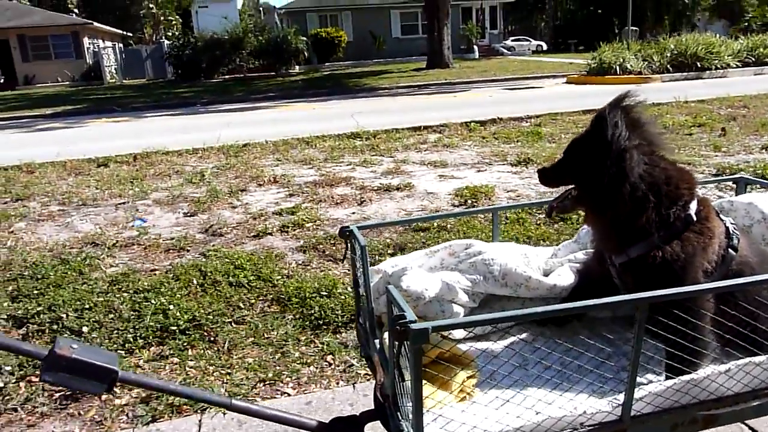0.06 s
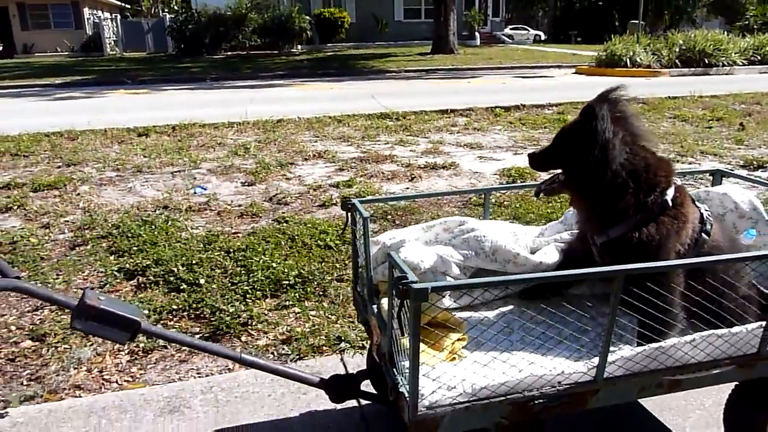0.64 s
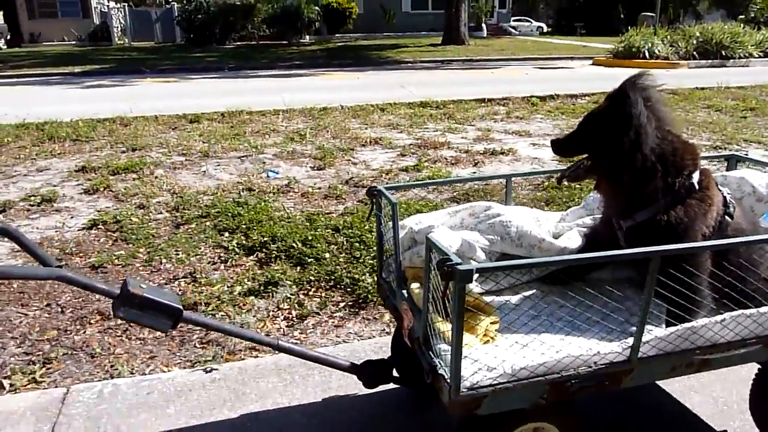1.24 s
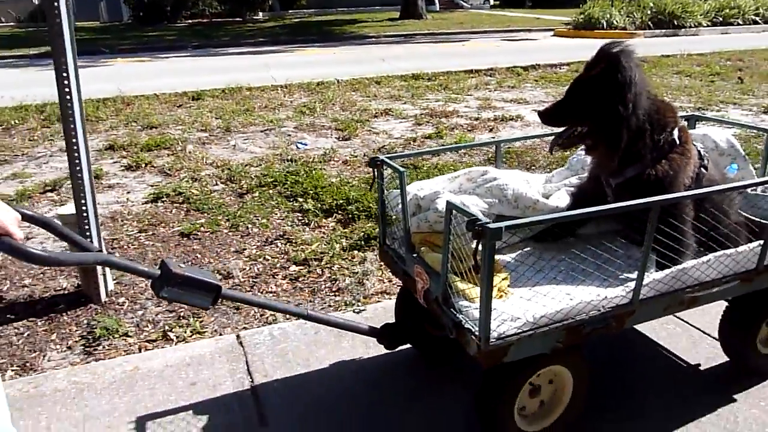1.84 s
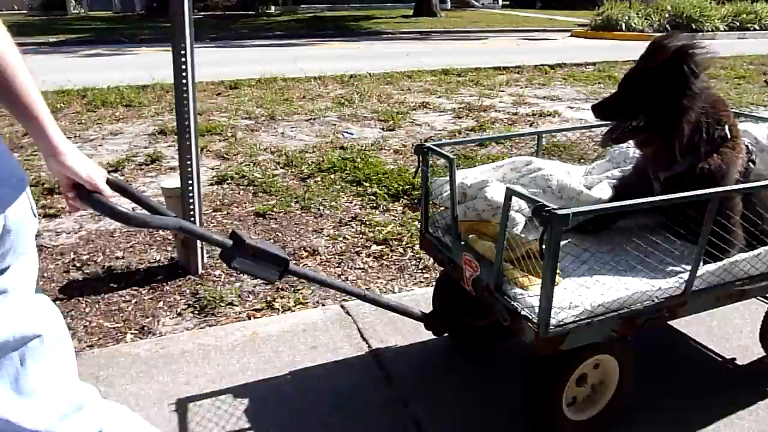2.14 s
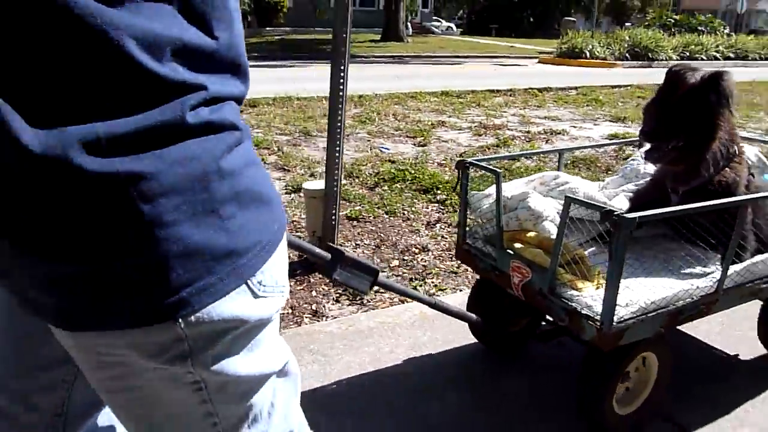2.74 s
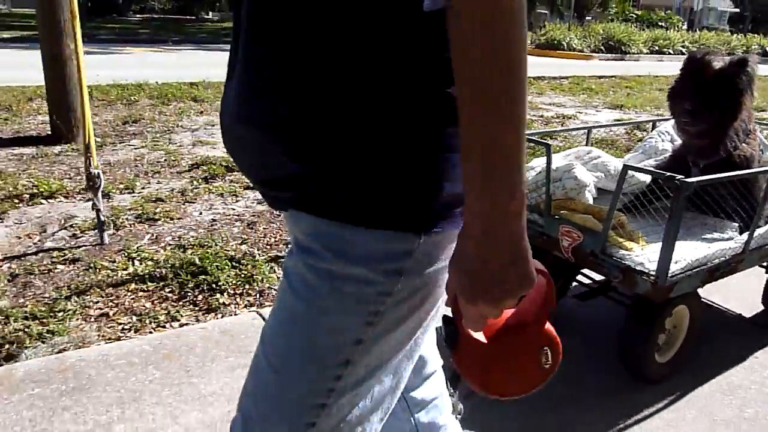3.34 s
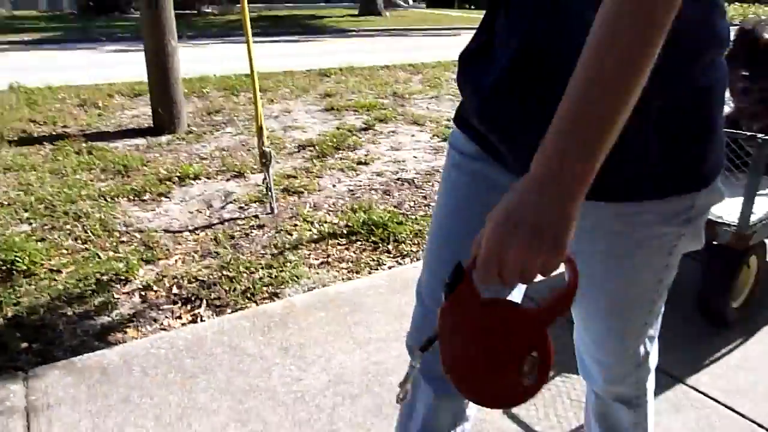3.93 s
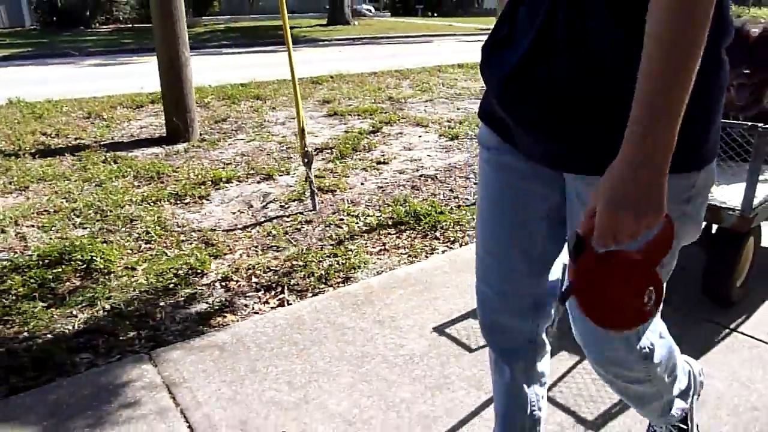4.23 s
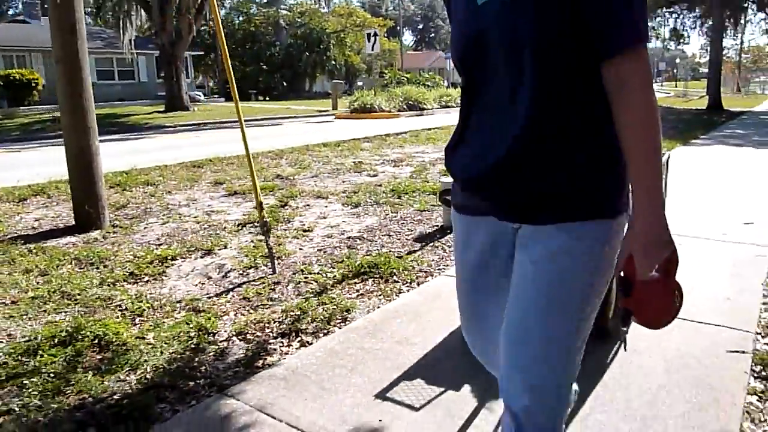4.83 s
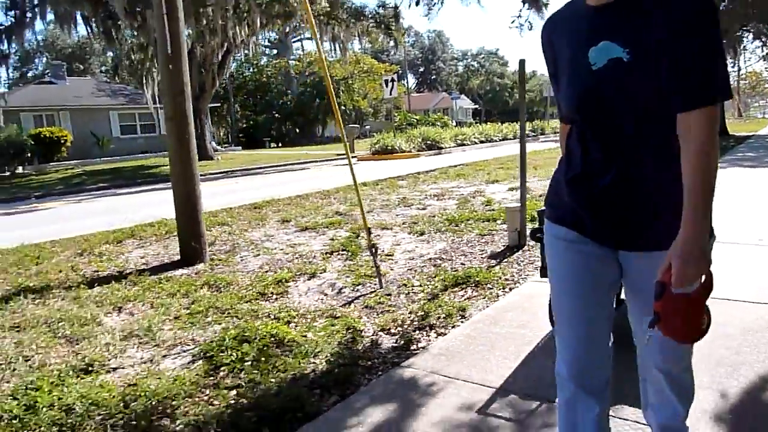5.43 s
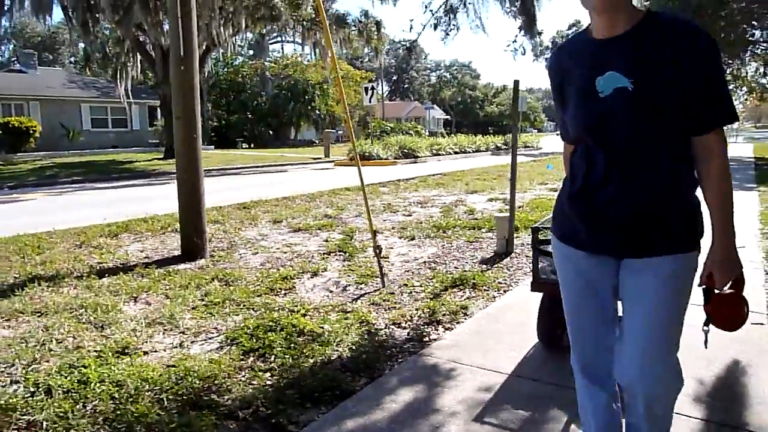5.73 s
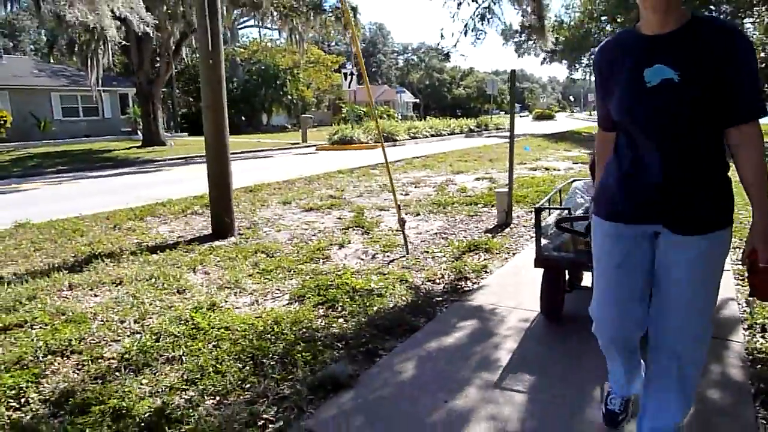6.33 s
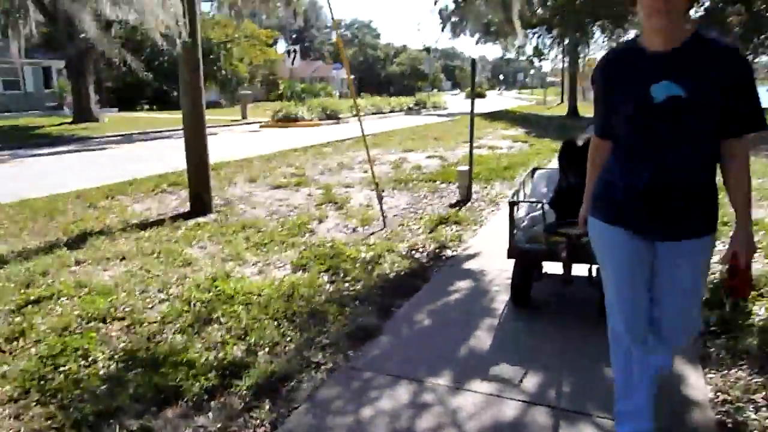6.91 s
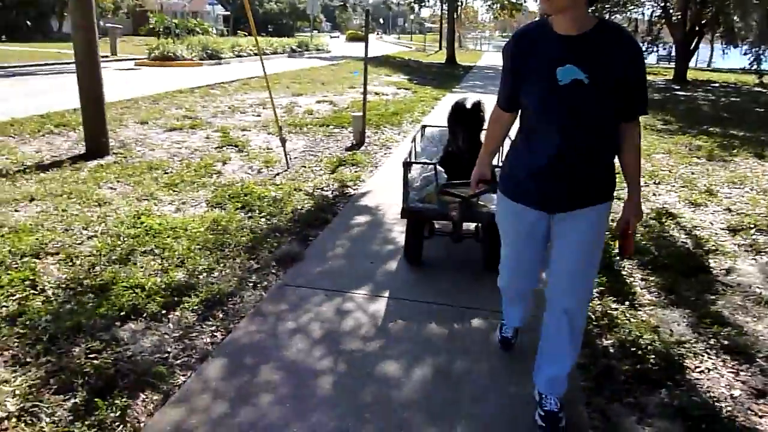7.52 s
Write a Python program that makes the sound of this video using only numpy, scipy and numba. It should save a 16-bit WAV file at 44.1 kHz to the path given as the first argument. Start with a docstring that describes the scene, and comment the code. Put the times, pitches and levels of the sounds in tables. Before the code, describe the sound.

Wind thumps and rasps on a hand-held microphone, loud for the first second, then dropping to scattered short puffs. Beneath it a steel mesh wagon rolls along a concrete sidewalk with a steady low tyre rumble, and loose metal gives small, bright ticks now and then. One dry wheel makes short, high squeaks from the start until nearly 4 seconds, clearest between 1 and 3 seconds. The walker's trousers swish softly with the strides, and shoes scuff on sandy concrete, mostly from about 3.2 to 4.3 seconds. Grit crunches under the tyres, a little louder and brighter as the wagon passes at around 4 seconds, then fades. Strong gusts return from about 4.5 to 7 seconds, hardest near 5.4, with one more faint squeak just after 6 and a weaker, raspy gust at about 7.5. A distant road hums faintly throughout.

```python
"""Gusts of wind thump and rasp on a hand-held camera's microphone as air swirls at its two openings.
Under them a steel mesh wagon is pulled along a concrete sidewalk: its tyres rumble and crunch grit,
loose metal ticks, and a dry wheel squeaks, mostly before the wagon has passed. The walker's trousers
swish, shoes scuff on sand, and a far road hums throughout."""
import sys
import numpy as np
from scipy import signal
from scipy.fft import rfft, irfft, next_fast_len
from scipy.io import wavfile
from scipy.ndimage import uniform_filter1d
from numba import njit

SR = 44100
rng = np.random.default_rng(int(sys.argv[2]) if len(sys.argv) > 2 else 0)


def pcm_store(signal):
    """Save signal as 16-bit PCM."""
    levels = np.round(np.clip(np.atleast_2d(signal), -1, 1) * 32767)
    wavfile.write(sys.argv[1], SR, levels.astype(np.int16).T)


N = 333837
T = np.arange(N) / SR
FREQ = np.maximum(np.fft.rfftfreq(next_fast_len(N, True), 1 / SR), 1)


def undb(db):
    """Turn decibels into a number to multiply by."""
    return 10 ** (np.asarray(db) / 20)


def unit(x):
    """Scale a signal to an average (rms) size of 1."""
    return x / np.sqrt(np.mean(x ** 2))


def curves(table):
    """Join a table's timed points with straight lines, one curve a column."""
    times, *columns = np.transpose(table)
    return [np.interp(T, times, column) for column in columns]


def shape(x, gain):
    """Turn each frequency up or down by its own gain."""
    size = next_fast_len(N, True)
    return irfft(rfft(x, size) * gain, size)[..., :N]


def colour(x, points):
    """Give a sound the tone of a (pitch_hz, level_db) table, fading below its first row."""
    hz, db = np.transpose(points)
    gain = undb(np.interp(np.log(FREQ), np.log(hz), db))
    return shape(x, gain / np.hypot(1, (hz[0] / FREQ) ** 2 / 2))


def wander(per_s):
    """A curve of size about 1 that slides to a new random value per_s times a second."""
    hold = max(int(SR / per_s), 20)
    steps = rng.standard_normal(N // 20 + 1)[np.arange(N) // hold]
    return unit(uniform_filter1d(steps, hold))


def pair(x, likeness):
    """Mix two signals into left and right: likeness 1 is the same, 0 unrelated, -1 opposite."""
    shared = np.sqrt((1 + likeness) / 2) * x[0]
    opposed = np.sqrt((1 - likeness) / 2) * x[1]
    return np.array([shared + opposed, shared - opposed])


def noise(likeness):
    """Plain hiss in stereo."""
    return pair(rng.standard_normal((2, N)), likeness)


def pan(db):
    """Gains that make the left side db louder than the right."""
    return undb(np.array([[.5], [-.5]]) * db)


# Gusts that hit the microphone: start_s, length_s, level_db
GUSTS = [(0, 0.18, -13.5), (0.195, 0.073, -13.5), (0.275, 0.107, -16.5), (0.408, .127, -14),
         (0.559, 0.091, -14.5), (0.688, .1, -15.5), (0.789, 0.029, -10), (0.834, 0.088, -13.5),
         (0.904, 0.043, -18.5), (1.106, 0.019, -26), (1.317, 0.015, -21.5), (1.417, 0.046, -24.5),
         (1.517, 0.017, -28), (1.789, 0.031, -18.5), (2.143, 0.035, -27.5), (2.235, 0.014, -12.5),
         (2.334, .009, -24), (2.408, 0.18, -27), (2.656, .055, -28.5), (2.738, 0.029, -25.5),
         (2.837, 0.024, -21), (2.945, 0.014, -18), (3.009, 0.022, -24), (3.097, .135, -25),
         (3.264, .034, -24), (3.574, 0.037, -19), (3.775, .079, -17), (3.892, .12, -27.5),
         (4.566, 0.049, -11.5), (4.639, 0.029, -15.5), (4.692, 0.017, -20.5), (4.824, 0.067, -19),
         (4.985, 0.044, -22.5), (5.049, 0.015, -13.5), (5.092, 0.022, -17.5), (5.149, 0.096, -20.5),
         (5.406, 0.061, -6), (5.469, 0.051, -15.5), (5.549, 0.07, -19), (5.659, 0.092, -14),
         (5.903, 0.078, -14), (5.987, 0.177, -15), (6.165, 0.15, -20.5), (6.42, 0.0097, -21.5),
         (6.53, 0.022, -22), (6.623, 0.051, -18.5), (6.723, 0.022, -17.5), (6.767, 0.019, -24),
         (6.807, .044, -17.5), (6.862, 0.083, -14.5), (7.024, 0.038, -11.5), (7.44, 0.12, -23.5)]
def gust_power(edge_s=0.0059, sag_db_per_s=9):
    """Each gust sets in at once, loses force while it lasts and drops away."""
    power = np.zeros(N)
    for start, length, db in GUSTS:
        span = slice(int(start * SR), int((start + length) * SR))
        power[span] += undb(db - sag_db_per_s * (T[span] - start)) ** 2
    edge = np.hanning(int(2 * edge_s * SR) + 3)
    return signal.fftconvolve(power, edge / edge.sum(), "same")


# The breeze between gusts: time_s, level_db
BREEZE = [(0, -27), (.85, -20.5), (.98, -49.5), (2.05, -51), (2.3, -42), (3.4, -51), (4.12, -50.5),
          (4.5, -33.5), (5.4, -31.5), (6.2, -32.5), (6.5, -30.5), (7.0, -23.5), (7.12, -36), (7.57, -40)]
# The wind's tone in a full gust, band by band: pitch_hz, level_db, growth_db_per_wind_db, likeness
WIND_BANDS = [(25, -25, -0.3, -0.2), (67.7, -5.5, 0.3, 0.1), (116, -1, .5, 0.11), (246.7, 4, 0.73, -0.13),
              (410.5, 0.5, 1.13, -0.33), (620, -5, 1.54, -0.72), (1110, -17.5, 1.98, -0.8),
              (1680, -29.5, 2.5, -0.77), (1980, -40, 4, -0.86), (2950, -57, 4, -0.68),
              (4750, -75, -0.5, -0.32)]
# How the wind meets the turning camera: time_s, extra_rasp_db, extra_bass_db, left_minus_right_db
WIND_ANGLE = [(0, 3.5, 1, -1), (.9, 2, 0, -0.5), (1.6, -1, -1, 0), (2.4, 0, 5, 0), (3.3, -21.5, -3.5, 1.5),
              (3.9, -17, -2, 2), (5.3, -7.5, 2, 1), (6.7, -6.5, 0, 0), (7.5, 8.5, 3.5, 1.5)]
def wind(gain_db=-44, full_gust_db=-16.5, ceiling_db=6.5, rasp_hz=1000, bass_hz=110):
    """Air swirls at the microphone. Faster air makes smaller swirls, so highs swell more than bass."""
    breeze_db = curves(BREEZE)[0] - 1.5 + 5 * wander(40)
    power = np.maximum(gust_power(), undb(breeze_db) ** 2)
    # both openings feel the same gust, and each has its own small swirls
    strength_db = 10 * np.log10(power) - full_gust_db + 1.84 * wander(170)
    strength_db = strength_db + 1.22 * np.array([wander(60), wander(60)])
    # the hardest gusts level off
    strength_db = -2 * np.logaddexp(-strength_db / 2, -ceiling_db / 2)
    centres, levels = np.transpose(WIND_BANDS)[:2]
    tone = undb(np.interp(np.log(FREQ), np.log(centres), levels)) * np.minimum(FREQ / centres[0], 1)
    rasp_db, bass_db, side_db = curves(WIND_ANGLE)
    out = 0
    for weights, (hz, _, growth, likeness) in zip(np.eye(len(WIND_BANDS)), WIND_BANDS):
        band = np.sqrt(np.interp(np.log(FREQ), np.log(centres), weights, right=0))
        angle_db = rasp_db / (1 + (rasp_hz / hz) ** 4) + bass_db / (1 + (hz / bass_hz) ** 4)
        out += shape(noise(likeness), band * tone) * undb(growth * strength_db + angle_db)
    return out * pan(side_db) * undb(gain_db) * np.sqrt(SR / 2)


# The tone of the rolling wagon: pitch_hz, level_db
RUMBLE_TONE = [(20, -19.5), (50, -11.5), (100, 8.5), (200, -9), (350, -9), (600, -8.5), (1200, -21),
               (3000, -32)]
def tyre_rumble(level_db=-43.5, bump_db=2):
    """The tyres drum over rough concrete and shake the wagon bed."""
    return undb(level_db + bump_db * wander(14)) * unit(colour(noise(0.18), RUMBLE_TONE))


def gritty_hiss(grit_db=-8.5, grains_per_s=350, spread_db=13):
    """Smooth hiss with sharp grains of uneven size in it, for sand and cloth."""
    sizes = undb(spread_db * np.minimum(rng.exponential(size=(2, N)), 4))
    signs = rng.choice([-1, 1], (2, N))
    hits = rng.random((2, N)) < grains_per_s / SR
    grains = pair(sizes * signs * hits, likeness=0.28)
    return noise(likeness=0.31) + undb(grit_db) * unit(grains)


# The tone of cracking sand: pitch_hz, level_db
CRUNCH_TONE = [(400, -15), (1000, 1.5), (2000, 1.5), (3000, -0.5), (5000, 0), (8500, -2), (12000, -7.5),
               (15500, -15)]
def sand_crunch(level_db=-50, passes_s=4.25, speed_m_s=0.73, nearest_m=1.25, dull_db_per_m=-4.5):
    """Sand cracks under the tyres, louder and brighter the nearer the wagon is."""
    along_m = speed_m_s * (T - passes_s)
    distance_m = np.hypot(along_m, nearest_m)
    sand = unit(colour(gritty_hiss(), CRUNCH_TONE))
    treble = shape(sand, np.interp(FREQ, [10000, 13000], [0, 1]))
    sand += treble * (undb(dull_db_per_m * (distance_m - nearest_m)) - 1)
    approach_db = -4 * np.maximum(-along_m / distance_m, 0)  # a little weaker before it passes
    return undb(level_db + approach_db + 1.7 * wander(30)) * nearest_m / distance_m * sand


# The tone of the far road: pitch_hz, level_db
ROAD_TONE = [(100, -34), (500, -7), (1000, 7), (1600, -1), (2500, -2.5), (5000, -11), (15000, -35)]
def far_road(level_db=-57, swell_db=0.5):
    """Far traffic and trees blend into a hush, the same on both sides."""
    return undb(level_db + swell_db * wander(2)) * unit(colour(noise(1), ROAD_TONE))


# Ticks of loose metal and grit: start_s, level_db, pitch_hz, left_minus_right_db
TICKS = [(.026, -36, 4000, 6.5), (.234, -39, 6540, -1), (.131, -38, 11500, 4), (.502, -37, 5500, -9),
         (0.755, -39, 10000, 4), (.765, -32, 9500, 1), (.798, -29.5, 10000, 4), (0.994, -34.5, 5070, 2),
         (1.961, -36, 7940, 0), (2.485, -34, 12000, -3), (3.018, -37.5, 8000, -3), (3.110, -32, 12500, 0),
         (3.368, -34, 9000, -2), (3.533, -26, 11000, -9), (4.720, -30, 14000, 0), (4.877, -33, 10800, 1),
         (5.334, -30, 9400, 1), (5.413, -23, 9300, 1), (6.839, -44, 5030, 21)]
def metal_ticks(gain_db=-2, decay_s=0.0018, width_octaves=0.74):
    """Small hard things knock together, bright and with almost no ring."""
    out, t = np.zeros((2, N)), T[:2048]
    octaves = np.log2(np.maximum(np.fft.rfftfreq(len(t), 1 / SR), 1))
    for start, db, hz, side_db in TICKS:
        hump = 1 / (1 + ((octaves - np.log2(hz)) / width_octaves) ** 2)
        crack = unit(irfft(rfft(rng.standard_normal((2, len(t)))) * hump))
        first = int(start * SR)
        out[:, first:first + len(t)] += undb(db + gain_db) * pan(side_db) * crack * np.exp(-t / decay_s)
    return out


# Squeaks of one wheel: middle_s, pitch_hz, level_db, half_length_s
SQUEAKS = [(0.103, 3720, -43, 0.026), (0.419, 3620, -41, 0.021), (0.568, 3660, -48.5, 0.049),
           (1.254, 3670, -33.5, 0.018), (1.493, 3668, -41, 0.011), (1.64, 3610, -38.5, .015),
           (1.773, 3690, -29.5, 0.0096), (1.918, 3565, -48.5, .018), (2.041, 3630, -34.5, 0.0095),
           (2.282, 3810, -37, 0.029), (2.402, 3530, -35, 0.02), (2.551, 3560, -46, 0.014),
           (2.67, 3620, -37, 0.013), (2.93, 3570, -42, 0.017), (3.176, 3710, -48, 0.068),
           (3.434, 3580, -48, 0.013), (3.57, 3630, -51, 0.046), (3.744, 3660, -50, 0.0305),
           (6.204, 3600, -54, .026)]
# The wheel is brightest while it faces the microphone: time_s, extra_overtones_db
WHEEL_FACING = [(0, 7.5), (1.3, -1), (4, -6)]
def wheel_squeaks(glide=0.008, overtones_db=(-15, -21, -26), bite_db=12, echo_db=-8, echo_s=0.022):
    """A dry wheel catches on its axle and sings briefly; the surroundings give a short echo."""
    wobble = 1 + .016 * wander(700)
    grip = undb(2.5 * wander(300))
    out, facing_db = np.zeros(N), curves(WHEEL_FACING)[0]
    for middle, hz, db, half_length in SQUEAKS:
        span = np.flatnonzero(abs(T - middle) < half_length)
        progress = (T[span] - middle) / half_length  # from -1 to 1
        # the pitch rises as the wheel grips and sags as it lets go
        pitch_hz = hz * wobble[span] * (1 + glide * (2 * progress - 4 * progress ** 2))
        phase = 2 * np.pi * np.cumsum(pitch_hz) / SR
        overtones = sum(undb(level) * np.sin(k * phase) for k, level in enumerate(overtones_db, 2))
        # the first bite is the brightest part
        tone = np.sin(phase) + undb(facing_db[span] - bite_db * progress) * overtones
        # it starts quickly and fades more slowly
        from_peak = np.clip(np.where(progress < 0, 1.77 * progress, progress), -1, 1)
        swell = np.cos(np.pi * from_peak / 2) ** 2
        out[span] += undb(db) * swell * grip[span] * tone
    t = T[:SR // 4]
    echo = rng.standard_normal((2, len(t))) * np.exp(-t / echo_s) * (t > .006)
    echo /= np.sqrt(np.sum(echo ** 2) / 2)
    return out + undb(echo_db) * signal.fftconvolve(out[None], echo, axes=1)[:, :N]


# Single big swirls of air that slap the microphone: start_s, level_db, pitch_hz
SLAPS = [(0.234, -2.5, 950), (0.486, -2, 560), (.575, -2, 690), (0.747, 1, 480), (.812, -4, 1340),
         (1.317, -9, 390), (1.795, -5, 580), (2.238, -2, 717), (2.952, -4, 570), (3.215, -8, 423),
         (3.595, -8.5, 360), (3.688, -6.5, 1100), (3.687, -2.5, 348), (4.639, -11, 540), (5.023, -2, 574),
         (5.049, -9, 516), (5.149, -7.5, 514), (5.406, -6, 450), (5.434, 2, 670), (5.664, -7, 654),
         (5.681, -0.5, 454), (5.935, -2.5, 637), (5.988, -6, 686), (6.536, -15, 755), (6.727, -4.5, 490),
         (6.813, -3.5, 464), (6.859, -12, 606), (6.978, -8, 1040), (7.036, -2.5, 625)]
def wind_slaps(gain_db=-2, rise_cycles=0.943, sag=0.52, snap_db=2):
    """One swirl hits: the air pressure swings a time or two, slowing as it dies."""
    out, t = np.zeros((2, N)), T[:SR // 25]
    for (start, db, hz), start_phase in zip(SLAPS, rng.uniform(0, 2 * np.pi, len(SLAPS))):
        rise_s = rise_cycles / hz
        age = t / rise_s
        pitch_hz = hz * (1 - sag * (1 - np.exp(-age / 2)))
        phase = start_phase + 2 * np.pi * np.cumsum(pitch_hz) / SR
        # the smaller the swirl, the more left and right are out of step
        apart_rad = 2.23 * np.tanh(hz / 430)
        swell = (age * np.exp(1 - age)) ** 3
        # a small, strong swirl comes to a sharp point, which snaps
        snap = undb(2 * db + snap_db) * (hz / 1000) ** 2 * np.exp(-abs(t - rise_s) / .00015)
        swing = (swell + snap) * np.sin([phase, phase + apart_rad])
        first = int(start * SR)
        out[:, first:first + len(t)] += undb(db + gain_db) * swing
    return out


# Trouser legs brushing past each other: start_s, length_s, level_db
SWISHES = [(0.644, 0.22, -49), (1.227, 0.092, -53.5), (1.37, 0.31, -54), (2.025, .2, -47.5),
           (2.353, 0.11, -57), (2.591, 0.11, -46.5), (2.77, 0.03, -51.5), (2.912, 0.029, -55),
           (3.01, 0.04, -65), (3.112, 0.34, -48), (3.49, 0.16, -53), (3.752, 0.26, -49.5),
           (4.146, 0.26, -48.5), (4.73, .22, -55), (5.262, 0.18, -48.5), (5.92, 0.13, -53),
           (6.55, 0.084, -60.5), (7.185, 0.19, -56)]
# The tone of rubbing cloth: pitch_hz, level_db
CLOTH_TONE = [(400, -4), (1000, 1), (2000, 2.5), (3000, 0.5), (5000, -1), (8500, -0.5), (12000, -2.5),
              (15500, -4)]
def trouser_swishes(gain_db=0.64, flicker_db=2.4, rise_s=0.015, fade_s=0.026):
    """Cloth rubs with each stride: it sets in, is strongest in mid swing and dies away."""
    rub = np.zeros(N)
    for start, length, db in SWISHES:
        first = int(start * SR)
        t = T[:min(SR, N - first)]
        arch_db = 1.5 * np.sin(np.pi * np.minimum(t / length, 1))
        rise = np.minimum(t / rise_s, 1)
        fade = np.exp(-np.maximum(t - length, 0) / fade_s)
        rub[first:first + len(t)] += undb(db + arch_db) * rise * fade
    return rub * undb(gain_db + flicker_db * wander(50)) * unit(colour(gritty_hiss(), CLOTH_TONE))


def burst(start_s, decay_s):
    """A level that jumps up and dies away."""
    out, first = np.zeros(N), int(start_s * SR)
    t = T[:min(SR // 4, N - first)]
    out[first:first + len(t)] = np.exp(-t / decay_s)
    return out


# Soles scraping the concrete: start_s, level_db, decay_s, left_minus_right_db
SCUFFS = [(2.611, -51, 0.022, 2), (3.242, -35, 0.0056, 0), (3.286, -37, 0.0065, 0), (3.324, -40, 0.0033, 0),
          (3.336, -31.5, 0.0017, 0), (3.367, -38, 0.0049, 0), (3.512, -39.5, 0.011, -1),
          (3.526, -40, 0.013, 0), (3.548, -40.5, 0.0099, -2), (3.65, -41, 0.0048, -4),
          (3.81, -42.5, 0.0089, -2), (3.904, -38.5, 0.021, -9), (3.95, -50.5, 0.039, -13.5),
          (4.175, -40.5, 0.028, -1), (4.23, -46, 0.034, 0), (5.621, -49, .005, 0), (6.33, -52, 0.011, -3),
          (6.611, -54, 0.025, -11)]
# The tone of a scrape: pitch_hz, level_db
SCUFF_TONE = [(400, 12), (1200, 8.5), (2500, 5.5), (4500, 3), (8000, 0.5), (12000, -3), (15500, -4)]
def shoe_scuffs(gain_db=3, grain_db=3):
    """A sole drags sand across the concrete in uneven slips."""
    push = sum(undb(db) * pan(side_db) * burst(start, decay) for start, db, decay, side_db in SCUFFS)
    return undb(gain_db + grain_db * wander(600)) * push * unit(colour(noise(1), SCUFF_TONE))


def scene():
    """The wagon and the walker outdoors, under the wind."""
    throughout = wind() + tyre_rumble() + sand_crunch() + far_road()
    return throughout + metal_ticks() + wheel_squeaks() + wind_slaps() + trouser_swishes() + shoe_scuffs()


@njit
def follow(x, rise_s, fall_s):
    """Track a level smoothly, at one speed going up and another coming down."""
    out, level = np.empty(len(x)), 0.
    for i in range(len(x)):
        level += (x[i] - level) / (SR * (rise_s if x[i] > level else fall_s))
        out[i] = level
    return out


def record(dry, turn_down_above_db=-16, turn_down_share=0.38, top_hz=15600):
    """The camera turns itself down in strong gusts, rounds the peaks and cuts the highest treble."""
    level = follow(abs(dry).max(axis=0), rise_s=0.01, fall_s=0.23)
    excess = np.maximum(level / undb(turn_down_above_db), 1)
    turned_down = dry * excess ** -turn_down_share
    rounded = .95 * np.tanh(turned_down / .95)
    return signal.sosfilt(signal.ellip(10, .2, 80, top_hz, fs=SR, output="sos"), rounded)


dry = scene()
out = record(dry)
pcm_store(out)
```